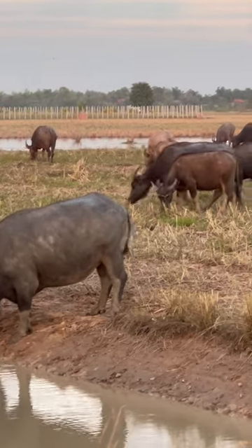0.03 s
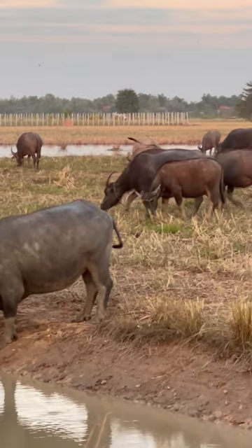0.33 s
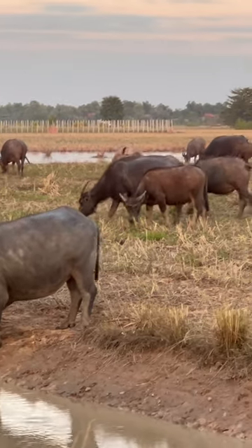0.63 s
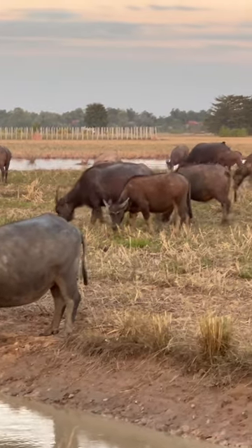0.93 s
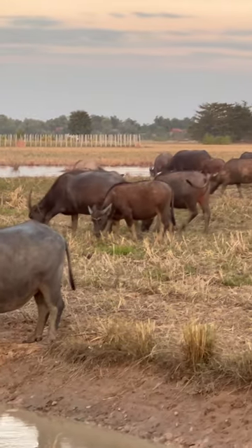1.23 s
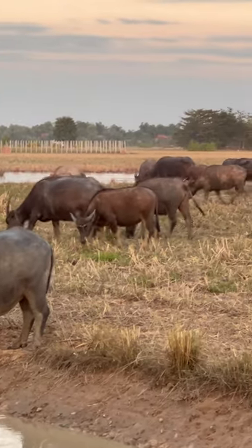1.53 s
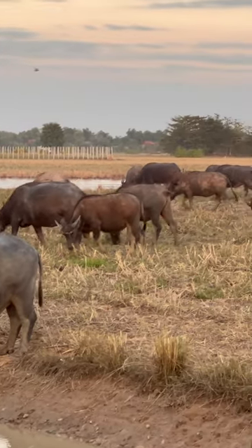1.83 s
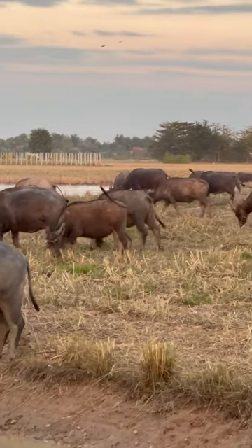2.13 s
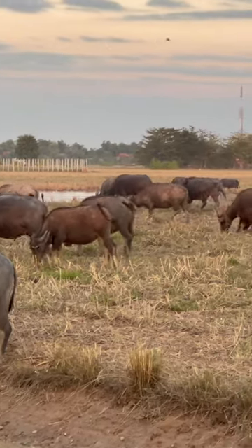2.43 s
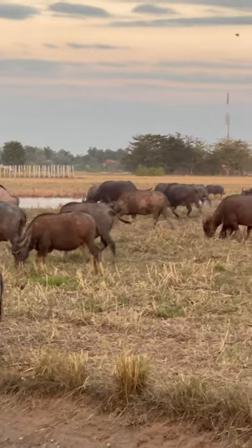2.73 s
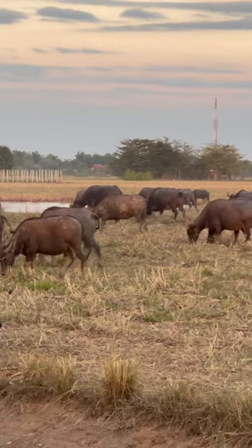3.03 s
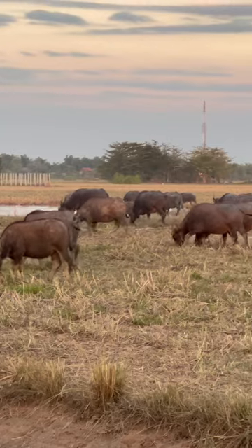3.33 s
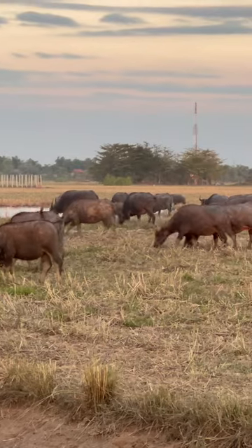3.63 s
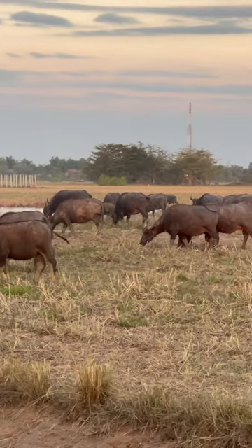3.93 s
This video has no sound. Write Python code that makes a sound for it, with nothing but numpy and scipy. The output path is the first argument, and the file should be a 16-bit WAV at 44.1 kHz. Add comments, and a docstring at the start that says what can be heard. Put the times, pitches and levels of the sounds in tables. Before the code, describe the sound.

A low rumble of wind mixes with a far engine's fading throb in a stubble field. Dry straw hisses and snaps softly under buffalo hooves, with faint bird and insect chirps, before a gust thumps the microphone.

```python
"""An open stubble field with grazing buffalo. Far to the left, the firings of a one-cylinder diesel ring
its exhaust under a soft rush, and eddies of wind buffet the microphone. Hooves scuff and thump; dry
straw hisses, crackles and snaps as its fibres break. A small bird gives arching chips, others twitter
far off, and a bush cricket stridulates one swelling run of chirps."""
import sys
import numpy as np
from scipy import signal
from scipy.fft import rfft, irfft
from scipy.io import wavfile
from scipy.ndimage import uniform_filter1d

SR = 44100
rng = np.random.default_rng(int(sys.argv[2]) if len(sys.argv) > 2 else 0)


def unload_wav(signal):
    """Save mono or channel-first audio to the path in sys.argv[1] as 16-bit WAV at rate SR, clipped to [-1, 1]."""
    wavfile.write(
        sys.argv[1],
        SR,
        np.round(np.clip(np.atleast_2d(signal).T, -1, 1) * 32767).astype(np.int16),
    )


N = 176400
TIME = np.arange(N) / SR

# exhaust modes (frequency [Hz], time to decay by 60 dB [s], relative level [dB])
EXHAUST_MODES = [(53.3, 0.14, -4), (73.4, 0.33, -11.5), (99.4, 0.092, -17), (111.1, .11, 2.5),
                 (128.3, 0.14, 0), (148.7, 0.11, -20), (222.9, 0.29, -22)]
# fading of the engine (time [s], level [dB])
ENGINE_FADE = [(0, -39.5), (1.1, -43), (2, -44.5), (2.7, -49), (4, -52.5)]


def engine(firing_hz=18.25, speedup_hz_per_s=.145, jitter_s=.001, scatter_db=2, rise_s=.015):
    """Impulse excitation: each firing rings the damped exhaust modes. Returns sound and firing cycle."""
    out, age = np.zeros(N), TIME[:N // 20]
    cycles = firing_hz * (TIME - .005) + speedup_hz_per_s * TIME ** 2 / 2
    for start in np.interp(np.arange(int(cycles[-1]) + 1), cycles, TIME):
        thud = np.zeros(len(age))
        for hz, t60, db in EXHAUST_MODES:
            gain = amp(db + scatter_db * rng.standard_normal())
            thud += gain * np.sin(2 * np.pi * hz * age) * np.exp(-np.log(1000) * age / t60)
        add(out, start + jitter_s * rng.standard_normal(), thud * (1 - np.exp(-age / rise_s)))
    return unit(out) * curve(ENGINE_FADE), np.cos(2 * np.pi * (cycles - .4))


# spectrum of the distant rush (frequency [Hz], relative density [dB])
RUSH_SPECTRUM = [(100, -1), (200, -2), (280, -0.5), (340, 0.5), (420, -2.5), (510, -0.5), (780, -5.5),
                 (890, -8.5), (1020, -7.5), (1350, -19.5), (1600, -21.5), (1900, -39.5), (3000, -91)]
# its envelope (time [s], level [dB])
RUSH_ENVELOPE = [(0, -47), (.5, -48.5), (1, -49), (2.4, -50.5), (3.1, -55), (3.5, -53), (3.75, -52),
                 (4, -55.5)]


def rush(firing_cycle, throb_depth=.088, flicker_db=1.36):
    """Amplitude modulation: far machinery and air, dulled by distance, throb in step with the engine."""
    noise = colour(rng.standard_normal(N), RUSH_SPECTRUM) * curve(RUSH_ENVELOPE)
    return noise * (1 + throb_depth * firing_cycle) * amp(flicker_db * drift(20))


# spectrum of the wind rumble (frequency [Hz], relative density [dB])
WIND_SPECTRUM = [(15, -38), (25, -12), (40, -15), (55, -13), (70, -6.5), (100, -11.5), (160, -26),
                 (250, -29), (600, -48.5)]
# its gusts (time [s], level [dB])
GUST_ENVELOPE = [(0, -35), (.15, -51.5), (1.2, -45), (2.2, -52), (2.75, -48.5), (2.85, -38.5),
                 (3.05, -40.5), (3.12, -43.5), (3.22, -41), (3.33, -49.5), (4, -45)]
# single eddies (centre time [s], duration [s], level [dB], frequency [Hz])
EDDIES = [(0.006, 0.081, -43, 62), (0.62, 0.061, -41.5, 68.4), (0.759, 0.053, -43, 64),
          (2.051, 0.13, -44, 55), (2.853, 0.13, -36, 55.5), (2.978, 0.0895, -31, 65.7),
          (3.035, 0.075, -35, 62), (3.209, 0.15, -33, 65.3), (3.458, 0.095, -42, 54.6),
          (3.682, 0.047, -39, 63), (3.764, 0.059, -43, 61.6), (3.899, 0.042, -38, 70)]


def wind(wander_db=1.1, rough_db=-8.5, cutoff_hz=195):
    """Turbulence: pressure fluctuations rumble at the microphone, and single eddies thump it."""
    rumble = colour(rng.standard_normal(N), WIND_SPECTRUM) * curve(GUST_ENVELOPE)
    rumble *= amp(wander_db * drift(7.53))
    thumps = np.zeros(N)
    for at, length, db, hz in EDDIES:
        eddy = puff(length, hz, octaves=.27) + amp(rough_db) * puff(length, 1.36 * hz, octaves=.89)
        add(thumps, at - length / 2, amp(db) * unit(eddy))
    return rumble + signal.sosfiltfilt(signal.butter(6, cutoff_hz, fs=SR, output="sos"), thumps)


def footfall(at_s=1.33, length_s=.0363, hz=99, db=-32):
    """Impact: one heavy step drives the ground through a few low cycles."""
    out, size = np.zeros(N), int(length_s * SR)
    thump = np.hanning(size) ** 2 * np.sin(2 * np.pi * (hz * TIME[:size] + rng.random()))
    add(out, at_s - length_s / 2, amp(db) * unit(thump))
    return out


# hooves on earth and straw (centre time [s], duration [s], level [dB], frequency [Hz])
HOOF_SCUFFS = [(0.245, 0.018, -48.5, 537), (0.513, 0.08, -52, 544), (2.152, 0.045, -50, 635),
               (2.368, 0.045, -60, 300), (0.629, 0.053, -68.5, 2630), (3.865, 0.15, -77, 2930)]
# breaking stalks (time [s], level [dB], ring frequency [Hz], ring decay [s], crack over ring [dB])
STALK_SNAPS = [(0.0162, -63, 5500, 0.0043, -8), (0.3608, -63, 2780, .005, -14),
               (.4775, -61, 5140, 0.0027, 8), (1.151, -64, 2200, .004, -8), (1.311, -56, 5500, 0.0023, 0.5),
               (2.0915, -55, 3100, 0.0019, -4), (2.149, -60, 2550, 0.0036, -3),
               (2.3418, -59, 2530, .004, -11), (2.423, -60, 4770, 0.0038, -2), (2.596, -62, 2650, .004, -8),
               (3.018, -59, 5600, .004, 2), (3.2025, -68, 6500, .003, 8), (3.7032, -64, 3040, 0.0044, -3),
               (3.895, -59.5, 3380, 0.005, -5), (3.9549, -56, 2870, .004, -7)]


def grazing(crack_hz=8000, crack_decay_s=.002):
    """Friction and fracture: hooves scuff; each stalk breaks with a bright crack and a damped ring."""
    out, age = np.zeros(N), TIME[:SR // 80]
    for at, length, db, hz in HOOF_SCUFFS:
        add(out, at - length / 2, amp(db) * puff(length, hz, octaves=.44))
    for at, db, hz, decay, crack_db in STALK_SNAPS:
        ring = unit(band(len(age), hz, octaves=.18) * np.exp(-age / decay))
        crack = unit(band(len(age), crack_hz, octaves=2.2) * np.exp(-age / crack_decay_s))
        add(out, at, amp(db) * unit(ring + amp(crack_db) * crack))
    return out


# crushed tufts and brushing leaves (centre time [s], duration [s], peak level [dB])
GRASS_CRUNCHES = [(2.152, 0.099, -63.5), (2.275, .1, -62), (2.377, 0.15, -67), (2.444, 0.11, -61.5)]
LEAF_SWISHES = [(.53, .09, -64), (1.148, 0.06, -69), (3.6, 0.095, -68), (3.72, 0.11, -68.5),
                (3.835, 0.079, -61), (3.935, 0.073, -65.5)]
# crunch and swish spectra, dipping at 10 kHz (frequency [Hz], relative density [dB])
CRUNCH_SPECTRUM = [(1500, -6), (2400, 13), (3800, -1), (4700, -7), (6000, 6), (8000, -5), (10000, -19),
                   (12000, 2), (15000, -10)]
SWISH_SPECTRUM = [(5000, -18), (8000, -2), (10000, -10), (12000, 10), (15500, -10)]


def rustle():
    """Crushing and rubbing: dry grass and leaves give swells of dense clicks."""
    crunches = swells(GRASS_CRUNCHES) * colour(fibres(), CRUNCH_SPECTRUM)
    swishes = swells(LEAF_SWISHES) * colour(fibres(), SWISH_SPECTRUM)
    return crunches + swishes


def fibres(breaks_per_s=1200, decay_s=.0012):
    """Incoherent addition: the decaying energies of tiny random fractures sum to a gritty noise."""
    clicks = (rng.random(N) < breaks_per_s / SR) * rng.standard_normal(N)
    energy = signal.fftconvolve(clicks ** 2, np.exp(-2 * TIME[:SR // 100] / decay_s))[:N]
    return np.sqrt(np.abs(energy)) * rng.standard_normal(N)


# calls (centre time [s], level [dB], centre pitch [Hz], duration [s], glide [octaves/s])
BIRD_CHIPS = [(0.13, -62.5, 2180, .012, 13), (.458, -63, 2240, .012, 25), (0.875, -61, 2770, .015, -9),
              (1.014, -55.5, 2460, .017, -45), (1.852, -60, 2090, .011, -5), (1.989, -59, 2620, .012, 27),
              (2.002, -62, 2320, .011, 20), (2.121, -60.5, 2060, .017, -9)]


def bird(arch_octaves=.3, hoarseness=.45):
    """Frequency modulation: the pitch of each hoarse chip arches over a rising or falling glide."""
    out = np.zeros(N)
    for at, db, hz, length, glide in BIRD_CHIPS:
        size = int(length * SR)
        from_centre = TIME[:size] - length / 2
        pitch = hz * 2 ** (glide * from_centre - arch_octaves * (2 * from_centre / length) ** 2)
        tone = np.sin(2 * np.pi * np.cumsum(pitch) / SR)
        chip = np.hanning(size) * (tone + hoarseness * band(size, hz, octaves=.2))
        add(out, at - length / 2, amp(db) * unit(chip))
    return out


# chirp onsets, slowly spacing out (time [s])
CHIRP_ONSETS = [1.158, 1.268, 1.383, 1.493, 1.609, 1.722, 1.838, 1.958, 2.076, 2.196, 2.316, 2.436, 2.552,
                2.677, 2.793, 2.917, 3.039, 3.168, 3.3]
# swell of the song (time [s], level [dB])
CRICKET_ENVELOPE = [(1.1, -77), (1.35, -69), (1.7, -70.5), (2.1, -66), (2.6, -65), (3.4, -65.7)]


def cricket(strokes=12, strokes_per_s=126, stroke_s=.006, wing_hz=8850, rise_hz_per_s=1400):
    """Stridulation: each wing stroke rings one resonance, growing and rising in pitch through a chirp."""
    swell_s, rasp_gain = .044, .81
    out, size = np.zeros(N), int(stroke_s * SR)
    for start in CHIRP_ONSETS:
        for delay in np.arange(strokes) / strokes_per_s:
            hz = (wing_hz + rise_hz_per_s * delay) * (1 + .004 * rng.standard_normal())
            tone = np.sin(2 * np.pi * (hz * TIME[:size] + rng.random()))
            stroke = unit(np.hanning(size) * (tone + rasp_gain * band(size, hz, octaves=.011)))
            add(out, start + delay, stroke * min((delay + stroke_s) / swell_s, 1))
    return through_grass(out) * curve(CRICKET_ENVELOPE)


def through_grass(x, decay_s=.02, tail_db=-8):
    """Multiple scattering: the grass smears a sound with a short diffuse tail."""
    age = TIME[:SR // 10]
    tail = signal.fftconvolve(x, rng.standard_normal(len(age)) * np.exp(-age / decay_s))[:N]
    return x + amp(tail_db) * np.std(x) * unit(tail)


# spectrum of the dry hiss, dipping at 10 kHz (frequency [Hz], relative density [dB])
DRY_HISS_SPECTRUM = [(900, -2), (1800, 3), (2600, 6.5), (4000, 2), (4650, -4), (5600, 0.5), (8000, -5.5),
                     (8950, -4), (10000, -14), (11500, 1.3), (13700, -6), (15500, -10)]
# its envelope (time [s], level [dB])
STRAW_ENVELOPE = [(0, -65), (.55, -64), (1.05, -66), (1.5, -63.5), (1.9, -64), (2.38, -62.5), (2.66, -67.5),
                  (3, -65.5), (3.5, -70), (3.88, -66), (4, -62)]


def straw(crackle_db=-5.5, flicker_db=.83):
    """Continuous and impulsive noise: dry stubble hisses and crackles under one flickering envelope."""
    hiss = colour(rng.standard_normal(N), DRY_HISS_SPECTRUM)
    ticks = amp(crackle_db) * colour(crackle(), DRY_HISS_SPECTRUM)
    return (hiss + ticks) * curve(STRAW_ENVELOPE) * amp(flicker_db * drift(22.51))


def crackle(breaks_per_s=150, lowest_hz=2024, span_octaves=2.7, decay_s=.0029, spread_db=2.5):
    """Brittle fracture: tiny stalks give way at random, each with its own pitch and a gritty tail."""
    out, age = np.zeros(N), TIME[:SR // 100]
    for when, rank, pitch in rng.random((int(breaks_per_s * N / SR), 3)):
        hz = lowest_hz * 2 ** (span_octaves * pitch)
        grit = uniform_filter1d(rng.standard_normal(len(age)), int(2 * SR / hz))
        grain = unit(grit * np.cos(2 * np.pi * hz * age) * np.exp(-age / decay_s))
        strength = amp(-spread_db * np.log(max(rank, .02)))  # many weak, a few strong
        add(out, when * N / SR, grain * strength * np.sqrt(hz / lowest_hz))
    return out


# bouts of song (centre time [s], duration [s], note level [dB], pitch [Hz], pitch spread [Hz])
TWITTER_BOUTS = [(0.32, 0.12, -85, 5550, 200), (2.865, .13, -74, 2520, 400), (3.028, 0.063, -83, 4300, 90),
                 (3.128, .13, -72.5, 2500, 450), (3.437, .12, -75, 2470, 400),
                 (3.452, 0.032, -87, 4300, 80), (3.616, 0.037, -82, 4300, 70), (3.667, 0.1, -72, 2460, 260),
                 (3.804, 0.044, -85, 4230, 70.8)]


def far_birds(notes=9, note_s=.036, blur_hz=220):
    """Narrow-band noise: blurred by distance, each bout of twittering is a scatter of faint notes."""
    out = np.zeros(N)
    for at, length, db, hz, spread in TWITTER_BOUTS:
        for slot, (late, detune) in zip(np.linspace(-.5, .5, notes), rng.uniform(-1.1, 1, (notes, 2))):
            pitch = hz + spread * detune
            centre = at + length * (slot + late / notes)
            note = puff(note_s, pitch, octaves=np.log2(1 + blur_hz / pitch))
            add(out, centre - note_s / 2, amp(db) * note)
    return out


# spectrum of the low air (frequency [Hz], relative density [dB])
AIR_SPECTRUM = [(25, 10), (60, 9), (130, -3), (220, -3), (500, -10), (1000, -7), (1600, -82.5)]
# faint hiss: a narrow band near 3 kHz, a high band near 11 kHz (frequency [Hz], relative density [dB])
STEREO_HISS_SPECTRUM = [(1800, -33), (2500, -36), (3100, 16), (3900, -3), (5000, -37), (6000, -31),
                        (7200, -10), (8500, 12), (11500, 23.5), (13500, -2), (15500, 11)]


def ambience(air_db=-60, hiss_db=-74, bird_gain_db=-35, grazing_gain_db=-26):
    """Diffuse sound: low air and scattered twittering and grazing, with a faint stereo hiss added."""
    air = amp(air_db) * colour(rng.standard_normal(N), AIR_SPECTRUM)
    hiss = amp(hiss_db) * colour(rng.standard_normal(N), STEREO_HISS_SPECTRUM)
    return air + hiss + amp(bird_gain_db) * far_birds() + amp(grazing_gain_db) * grazing()


# left and right differences by frequency (frequency [Hz], left phase lead [rad], left minus right level [dB])
CHANNEL_DIFFERENCES = [(50, .2, -.2), (140, .26, -.6), (260, .47, .4), (450, .82, 2.7), (800, 1.28, 5.3),
                       (1150, 1.1, 3.6), (1450, .45, 1), (1800, .05, 0), (7200, 0, 0), (8200, -.7, 0),
                       (8850, -1.85, 0), (10000, -3.14, 0), (11000, -4.4, 0), (12200, -5.3, 0),
                       (13500, -6.2, 0), (15300, -5.3, 0)]


def stereo_image(x):
    """Interchannel differences: left and right each take half of the phase and level difference."""
    hz, lead, db = np.array(CHANNEL_DIFFERENCES).T
    f = np.fft.rfftfreq(N, 1 / SR)
    half = amp(np.interp(f, hz, db) / 2) * np.exp(.5j * np.interp(f, hz, lead))
    return irfft(rfft(x) * np.array([half, 1 / half]), N)


def amp(db):
    """Decibels to amplitude ratio."""
    return 10 ** (np.asarray(db) / 20)


def unit(x):
    """Normalisation to rms 1."""
    return x / np.sqrt(np.mean(x ** 2) + 1e-30)


def curve(rows):
    """Gain envelope through (time [s], level [dB]) points."""
    return amp(np.interp(TIME, *np.array(rows).T))


def swells(rows):
    """Gain envelope of (centre time [s], duration [s], peak level [dB]) bumps."""
    out = np.zeros(N)
    for at, length, db in rows:
        add(out, at - length / 2, amp(db) * np.hanning(int(length * SR)))
    return out


def colour(x, points):
    """Spectral shaping by (frequency [Hz], gain [dB]) points, to rms 1."""
    hz, db = np.array(points).T
    f = np.maximum(np.fft.rfftfreq(N, 1 / SR), 1)
    skirt = np.minimum(f / hz[0], 1) ** 2 * np.minimum(hz[-1] / f, 1) ** 2
    gain = amp(np.interp(np.log(f), np.log(hz), db))
    return unit(irfft(rfft(x) * gain * skirt, N))


def band(size, hz, octaves):
    """Random-phase noise under one resonance peak."""
    f = np.maximum(np.fft.rfftfreq(N // 8, 1 / SR), 1)
    shape = np.exp(-.5 * (np.log2(f / hz) / octaves) ** 2)
    return unit(irfft(shape * np.exp(2j * np.pi * rng.random(len(f))))[:size])


def puff(length, hz, octaves):
    """Windowed band noise that swells and fades."""
    size = int(length * SR)
    return unit(np.hanning(size) * band(size, hz, octaves))


def drift(rate_hz):
    """Smoothed random steps, rms 1."""
    hold = int(SR / rate_hz)
    steps = np.repeat(rng.standard_normal(N // hold + 1), hold)
    return unit(uniform_filter1d(uniform_filter1d(steps, hold), hold)[:N])


def add(out, start, x):
    """Superpose x on out at a start time [s]."""
    i = int(start * SR)
    x, i = x[max(-i, 0):], max(i, 0)
    out[i:i + len(x)] += x[:max(N - i, 0)]


def scene():
    """Superposition: direct sound takes the left-right differences, and the ambience joins them in antiphase."""
    thuds, firing_cycle = engine()
    around = ambience()
    direct = thuds + rush(firing_cycle) + wind() + straw() + rustle() + footfall() + grazing()
    direct += bird() + far_birds() + cricket()
    return stereo_image(direct) + around * np.array([[1], [-1]])


def record(dry):
    """Band limiting: filters trim the deepest bass and cut the highest treble."""
    low_hz, top_hz = 26, 15350
    trimmed = signal.sosfilt(signal.butter(2, low_hz, "high", fs=SR, output="sos"), dry)
    return signal.sosfilt(signal.ellip(8, .2, 70, top_hz, fs=SR, output="sos"), trimmed)


dry = scene()
out = record(dry)
unload_wav(out)
```